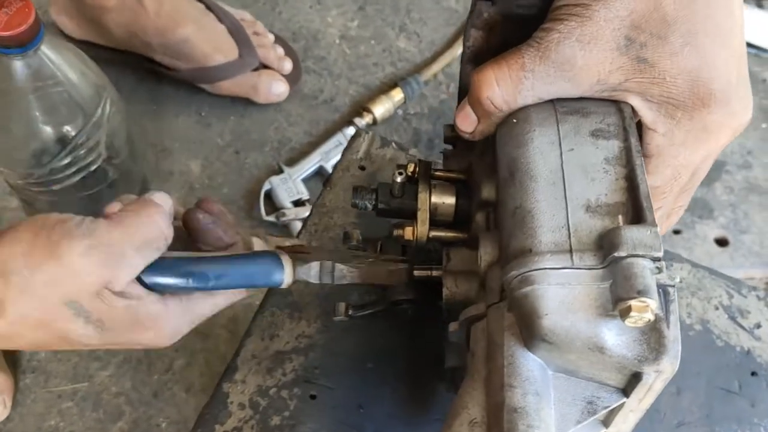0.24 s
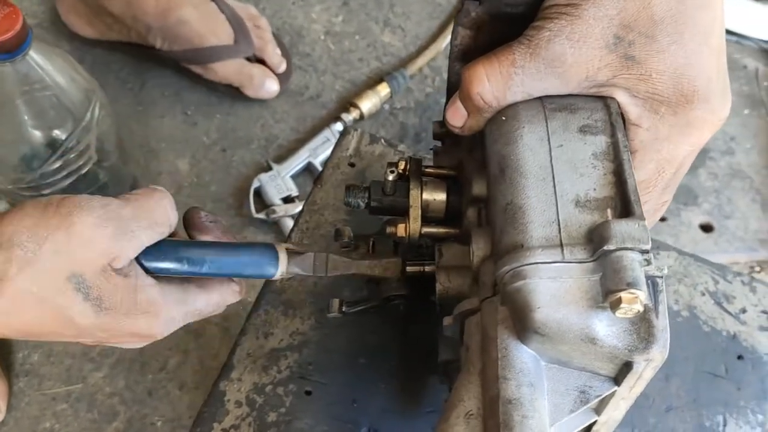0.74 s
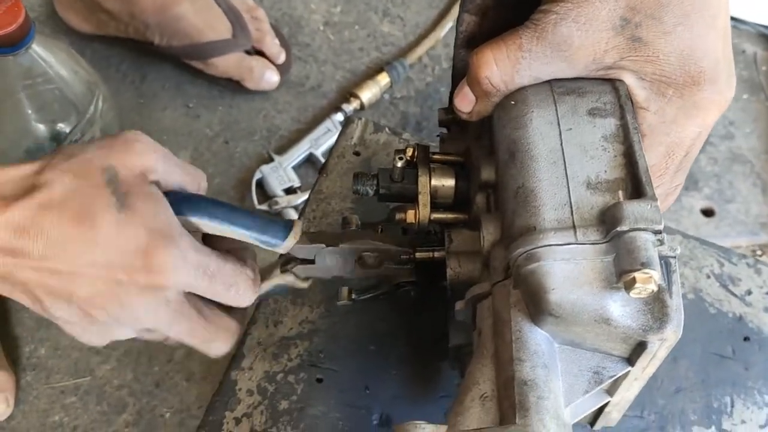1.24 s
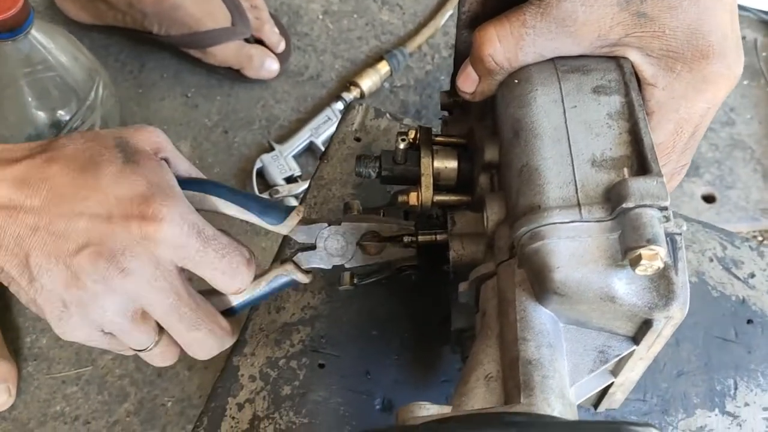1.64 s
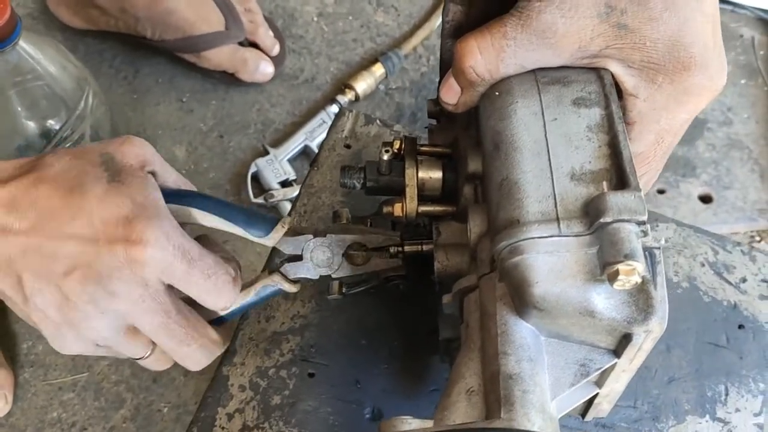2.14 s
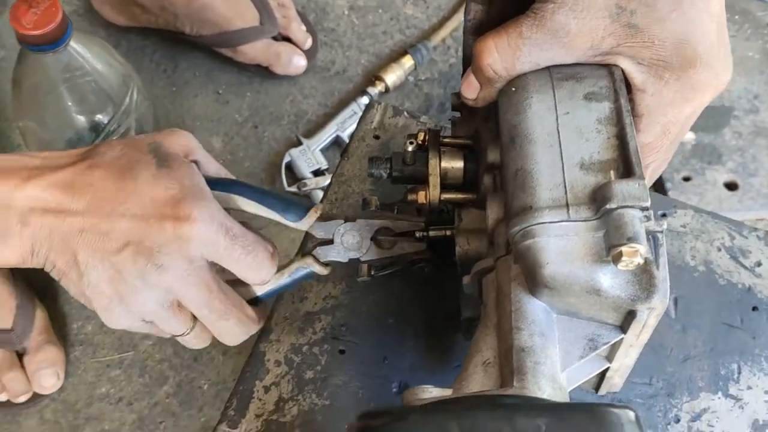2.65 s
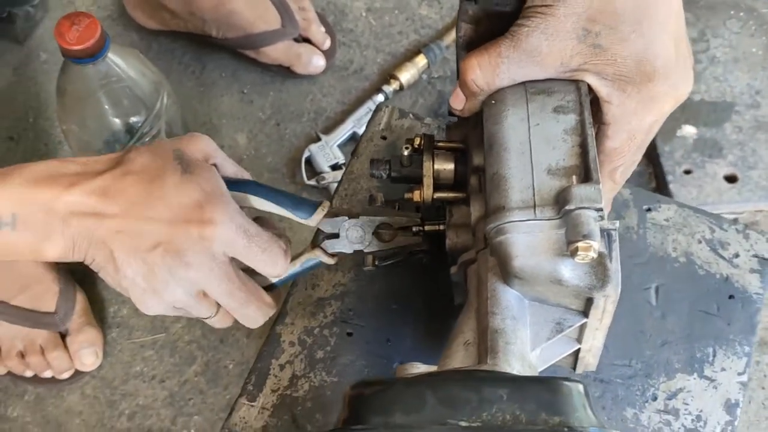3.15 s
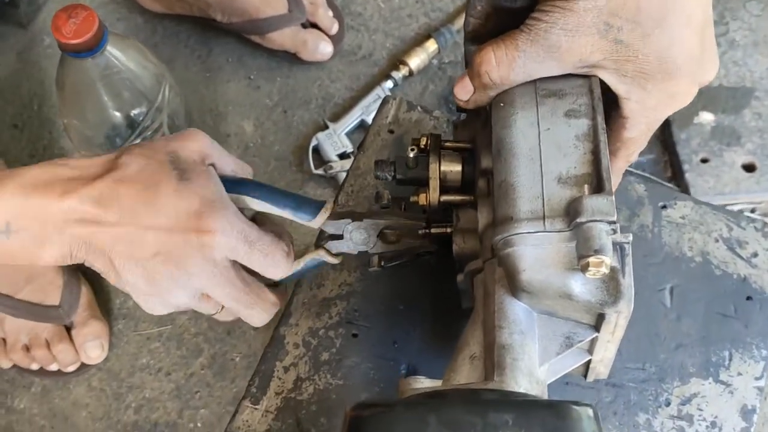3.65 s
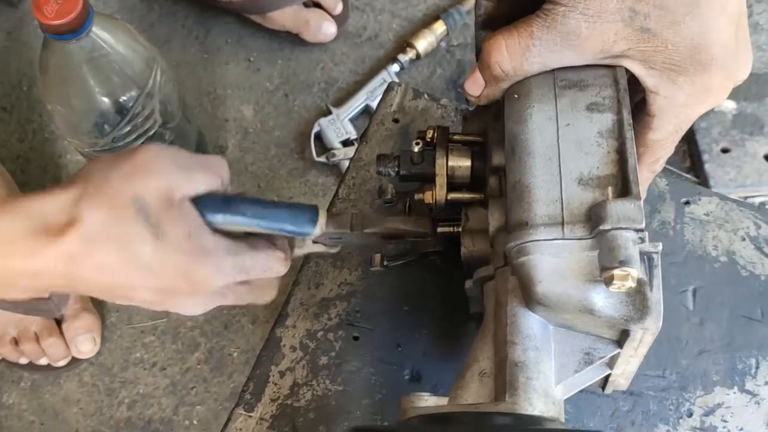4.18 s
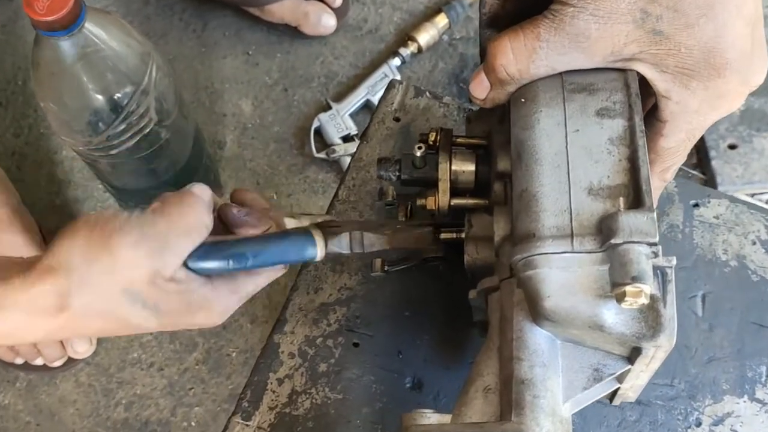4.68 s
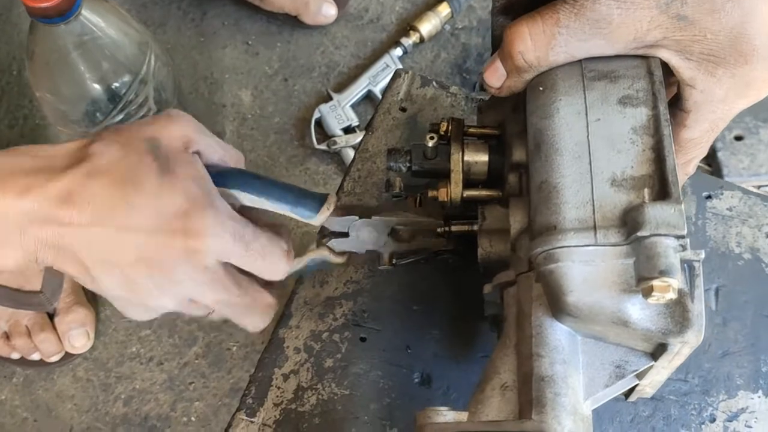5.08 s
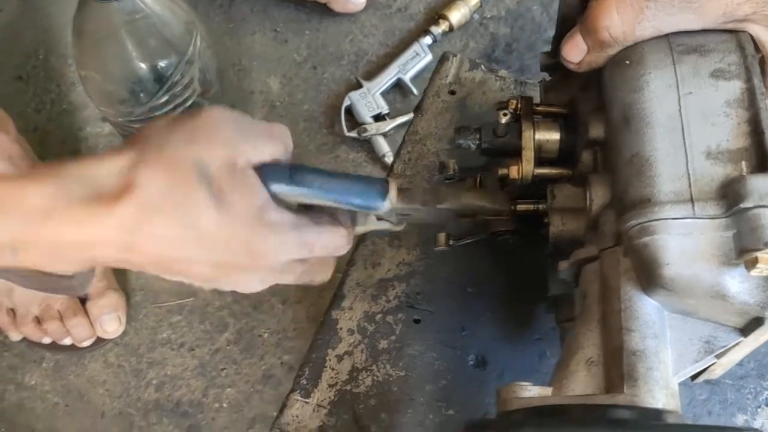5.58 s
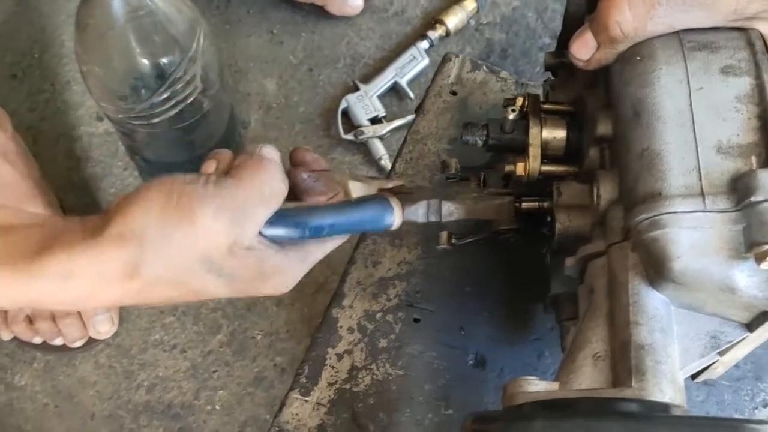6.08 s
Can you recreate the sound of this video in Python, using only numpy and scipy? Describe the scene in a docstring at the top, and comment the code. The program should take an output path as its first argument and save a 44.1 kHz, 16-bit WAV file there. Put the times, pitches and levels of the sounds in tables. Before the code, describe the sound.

Close to the microphone, grit crunches between an engine valve and its seat as pliers turn it to and fro. Each quick, dry rasp swells and dies away, with small metal clicks as the valve lands. The scrapes are uneven at first, then settle into a regular rhythm with faint hissing return turns. Behind them, the workshop has a soft rumble, hiss and a far low hum.

```python
"""Hand-lapping an engine valve.

Pliers twist a valve to and fro on a seat smeared with grinding compound. Crushed grit rasps through
the valve and the aluminium cylinder head while the stem groans by stick and slip. The valve ticks as
it lands and whispers in its guide as it is turned back. Close stereo, workshop hiss, a far low drone."""
import sys
import numpy as np
from scipy import signal
from scipy.fft import rfft, irfft, next_fast_len
from scipy.io import wavfile
from scipy.ndimage import uniform_filter1d

SR = 44100
rng = np.random.default_rng(int(sys.argv[2]) if len(sys.argv) > 2 else 0)


def to_wav(s):
    """Save 16-bit WAV."""
    ch = np.atleast_2d(s).T  # columns
    pcm = np.round(np.clip(ch, -1, 1) * 32767)  # PCM
    wavfile.write(sys.argv[1], SR, pcm.astype(np.int16))


N = 278756
TAPS = 4096
TIME_S = np.arange(N) / SR
BINS_HZ = np.fft.rfftfreq(TAPS, 1 / SR)


def amp(db):
    """Decibels to gain."""
    return 10 ** (np.asarray(db) / 20)


def unit_rms(x):
    """Scales to rms 1."""
    return x / np.sqrt(np.mean(x ** 2) + 1e-20)


def curve(points):
    """A (frequency, value) table interpolated onto BINS_HZ over log frequency."""
    hz, value = np.transpose(points)
    return np.interp(np.log(BINS_HZ + 1), np.log(hz + 1), value)


def add(mix, start_s, sound):
    """Mixes a multichannel sound in at start_s."""
    part = mix[:, max(round(start_s * SR), 0):][:, :sound.shape[1]]
    part += sound[:, :part.shape[1]]


def wander(length, rate_hz):
    """Smooth noise of rms about 1, rolled off above rate_hz."""
    size = next_fast_len(length + SR // 8)
    rolloff = np.exp(-.5 * (np.fft.rfftfreq(size, 1 / SR) / rate_hz) ** 2)
    return unit_rms(irfft(rfft(rng.standard_normal(size)) * rolloff, size))[:length]


def minimum_phase(gain):
    """Causal impulse response with this gain over BINS_HZ."""
    log_gain = np.log(np.maximum(gain, gain.max() * 1e-5))
    mirrored = np.concatenate([log_gain, log_gain[-2:0:-1]])
    return np.fft.ifft(np.exp(np.conj(signal.hilbert(mirrored)))).real


def stereo_filter(gain, balance, coherence):
    """Responses (ear, input, taps) for one shared input and one per ear; mid energy 1."""
    shared = np.clip(curve(coherence), 0, .999)
    left, right = amp(curve(balance) / 2), amp(-curve(balance) / 2)
    mid = np.sqrt(left ** 2 + right ** 2 + 2 * shared) / 2
    gain = unit_rms(gain) / mid
    return np.array([[minimum_phase(gain * ear * np.sqrt(share)) for share in (shared, 1 - shared)]
                     for ear in (left, right)])


def excite(responses, drive):
    """Three drives (shared, left, right) through a stereo filter."""
    per_ear = np.array([drive[[0, 1]], drive[[0, 2]]])
    return signal.fftconvolve(per_ear, responses, axes=2).sum(1)


def resonate(x, hz, width_hz):
    """Unity-gain resonance that follows the curve hz."""
    carrier = np.exp(2j * np.pi * np.cumsum(hz) / SR)
    pole = np.exp(-np.pi * width_hz / SR)
    return 2 * (carrier * signal.lfilter([1 - pole], [1, -pole], x / carrier)).real


def coloured_noise(spectrum):
    """Uncorrelated stereo noise of rms 1."""
    response = minimum_phase(amp(curve(spectrum)))
    return unit_rms(signal.oaconvolve(rng.standard_normal((2, N)), response[None], axes=1)[:, :N])


# workshop air spectrum: (frequency [Hz], relative density [dB])
AIR_SPECTRUM = [(15, -21), (25, -6), (98, -3.5), (194, -6.5), (219, -12), (304, -13.5), (367, -15.5),
                (423, -18), (454, -18), (536, -16.5), (1870, -28.5), (3530, -22), (6080, -33), (7000, -35),
                (9100, -71), (15400, -120)]
# its stereo balance: (frequency [Hz], left minus right [dB])
AIR_BALANCE = [(60, -0.5), (100, -0.5), (180, -1.0), (310, 0.5), (550, -1.0), (950, -2.0), (1650, -3.5),
               (2860, -10.5), (4970, -12.0), (8640, -0.5), (15000, -2.5)]
# its likeness between the ears: (frequency [Hz], coherence [0..1])
AIR_COHERENCE = [(50, .98), (150, .96), (400, .92), (1000, .7), (2000, .2), (4000, 0), (16000, 0)]


def workshop_air(level_db=-41.6):
    """Steady rumble and hiss, alike at both ears in the bass, diffuse in the treble."""
    responses = stereo_filter(amp(curve(AIR_SPECTRUM)), AIR_BALANCE, AIR_COHERENCE)
    air = excite(responses, rng.standard_normal((3, N + TAPS)))
    return amp(level_db) * air[:, TAPS:TAPS + N]


# microphone self-noise: (frequency [Hz], relative density [dB])
MIC_SPECTRUM = [(3000, -3), (6500, -41), (7500, 10.5), (10000, 13), (14000, 3), (16000, -11)]


def mic_hiss(level_db=-61):
    """Faint top hiss of the microphones."""
    return amp(level_db) * coloured_noise(MIC_SPECTRUM)


def hum(hz, level_db, waver_db=3, drift_hz=2.5):
    """A tone that wavers in level and pitch."""
    cycles = np.cumsum(hz + drift_hz * wander(N, 8.75)) / SR
    waver = amp(waver_db * wander(N, 6))
    return amp(level_db) * unit_rms(waver * np.sin(2 * np.pi * cycles))


# drone swells: (centre [s], half length [s], target pitch [Hz], level [dB])
DRONE_SWELLS = [(1.818, .15, 89.3, -41), (3.534, 0.19, 104.8, -42), (4.294, 0.1964, 94.55, -45.5),
                (5.535, 0.37, 104, -35.5)]


def far_drone(rest_hz=101.6, rest_db=-50, fundamental_db=-4, octave_db=-15):
    """A far drone with its octave; each swell pulls it toward its own pitch."""
    centre_s, half_s, swell_hz, swell_db = np.transpose(DRONE_SWELLS)[:, :, None]
    swells = amp(swell_db) * np.exp(-((TIME_S - centre_s) / half_s) ** 2)
    level = amp(rest_db) + swells.sum(0)
    hz = (amp(rest_db) * rest_hz + (swells * swell_hz).sum(0)) / level
    fundamental = hum(hz, fundamental_db, waver_db=2.5, drift_hz=4.28)
    return level * (fundamental + hum(2 * hz, octave_db, drift_hz=7.8))


def room(x, level_db=-18, low_t60_s=0.42, high_t60_s=0.36):
    """Sparse reflections from floor and walls; the treble dies first."""
    echoes = rng.standard_normal((2, SR // 2)) * (rng.random((2, SR // 2)) < 3000 / SR)
    echoes[:, :SR // 200] = 0
    hz, t, spectra = signal.stft(echoes, SR, nperseg=256)
    shared = 1 / (1 + (hz[:, None] / 1000) ** 4)  # long waves reach both ears alike
    spectra = np.sqrt(shared) * spectra[0] + np.sqrt(1 - shared) * spectra
    t60_s = np.interp(hz, [500, 8000], [low_t60_s, high_t60_s])[:, None]
    tail = signal.istft(spectra * 10 ** (-3 * t / t60_s), SR, nperseg=256)[1]
    tail /= np.linalg.norm(tail, axis=1, keepdims=True)
    return amp(level_db) * signal.fftconvolve(x, tail, axes=1)[:, :N]


# return turns of the lifted valve: (start [s], length [s], time to top speed [s], level there [dB])
RETURN_TURNS = [(2.448, 0.36, 0.073, -50), (3.93, .19, 0.099, -47.5), (4.393, .15, .09, -50),
                (4.84, .27, 0.075, -42.5), (5.31, 0.23, 0.088, -42), (5.778, .24, 0.097, -43.5)]
# stem-in-guide friction: (frequency [Hz], relative density [dB])
WHISPER_SPECTRUM = [(2500, -34), (5000, 11), (6500, -10), (7600, -5), (9900, 8.5), (11500, -6), (16000, -2)]


def stem_whisper(trim_db=-3.5, ends_db=-16):
    """The unloaded stem slides in its guide, speeding up and slowing again."""
    speed = np.zeros(N)
    for start_s, length_s, fastest_s, level_db in RETURN_TURNS:
        arch_db = np.interp(TIME_S - start_s, [0, fastest_s, length_s], [ends_db, 0, ends_db])
        turning = (TIME_S > start_s) & (TIME_S < start_s + length_s)
        speed += amp(level_db + arch_db) * turning
    return amp(trim_db) * uniform_filter1d(speed, SR // 50) * coloured_noise(WHISPER_SPECTRUM)


# longest-lived casting modes: (frequency [Hz], width [Hz], gain [dB])
LONG_MODES = [(220, 14, -4), (296, 2, 1)]


def casting_ring(valve):
    """The casting rings on after each contact, alike at both ears."""
    return sum(amp(db) * resonate(valve.mean(0), np.full(N, hz), width_hz)
               for hz, width_hz, db in LONG_MODES)


# broad response of valve and head: (frequency [Hz], relative gain [dB])
HEAD_SPECTRUM = [(60, -38), (200, -11), (400, -2), (800, -4), (1100, -7.5), (1450, -12), (2100, -9),
                 (3900, -9), (4600, -3.5), (5400, -6), (5900, -14.5), (7400, -25), (9500, -25.5),
                 (13000, -31), (16000, -39)]
# their modes: (frequency [Hz], width [Hz], height over the broad response [dB])
HEAD_RESONANCES = [(224, 30, 4), (297, 18, 4.5), (500, 90, 2), (915, 110, 3.5), (1090, 70, 3),
                   (1329, 60, 3), (1895, 55, 5), (2240, 80, 4.5), (2995, 45, 7), (3053, 25, 6),
                   (3800, 110, 3), (4555, 40, 3.5), (6195, 45, 7), (6400, 120, 4), (7010, 55, 5.5)]
# their stereo balance: (frequency [Hz], left minus right [dB])
HEAD_BALANCE = [(60, -0.5), (95, -0.5), (150, -1.0), (240, -1.0), (380, -1.0), (600, -1.5), (950, -3.0),
                (1500, -6.0), (2380, -10.0), (3770, -17.0), (5980, -11.5), (9470, 0.5), (15000, -3.0)]
# their likeness between the ears: (frequency [Hz], coherence [0..1])
HEAD_COHERENCE = [(100, .98), (550, .97), (950, .85), (1400, .25), (3000, .05), (4900, .25), (7000, 0),
                  (16000, .05)]


def cylinder_head(crossovers_hz=(1400, 7000)):
    """Stereo responses of valve and head in three bands: low, mid, high."""
    modes = sum((amp(db) ** 2 - 1) / (1 + (2 * (BINS_HZ - hz) / width_hz) ** 2)
                for hz, width_hz, db in HEAD_RESONANCES)
    gain = amp(curve(HEAD_SPECTRUM)) * np.sqrt(np.maximum(1 + modes, .1))
    low, below_high = (1 / (1 + (BINS_HZ / hz) ** 10) for hz in crossovers_hz)
    return [stereo_filter(gain * np.sqrt(share), HEAD_BALANCE, HEAD_COHERENCE)
            for share in (low, below_high * (1 - low), 1 - below_high)]


def near_reflections(x, strength, count=7, lag_range_s=(.0003, .005)):
    """Fins, pliers and hand comb the sound, by new paths each time."""
    paths = np.zeros((2, round(SR * lag_range_s[1]) + 2))
    for ear in paths:
        lags_s = rng.uniform(*lag_range_s, count)
        gains = unit_rms(rng.choice([-1., 1.], count) / np.sqrt(lags_s)) / np.sqrt(count)
        np.add.at(ear, (SR * lags_s).astype(int), strength * gains)
    paths[:, 0] = 1
    return signal.fftconvolve(x, paths, axes=1)[:, :x.shape[1]] / np.sqrt(1 + strength ** 2)


def grit(length, grains_per_s, spread_db):
    """Three drives of abrasive grains cracking at random times and sizes."""
    hits = rng.random((3, length)) < grains_per_s / SR
    sizes = amp(spread_db * np.minimum(rng.exponential(1, (3, length)), 4))
    return unit_rms(hits * sizes * rng.choice([-1., 1.], (3, length)))


def contact_burst(t, decay_s):
    """A dying cluster of tiny contacts; decay_s sets its energy."""
    fade = np.exp(-t / decay_s)
    contacts = grit(len(t), grains_per_s=14000, spread_db=2.5)
    return unit_rms(contacts * fade) * np.sqrt(np.mean(fade ** 2))


# metal-on-metal contacts: (time [s], level [dB], knock offset [dB], edge offset [dB])
VALVE_TICKS = [(0.0611, -25, -12.5, -15), (0.16, -30, -13, -18), (0.603, -29, -14, -10),
               (0.6666, -26, -17, -14), (0.9722, -24, -5.5, -11), (1.1458, -32, -12, -15),
               (1.3013, -24.5, -14, -13), (1.7853, -33, -12, -3.5), (1.8148, -19, -20, -9),
               (2.0183, -21, -11, -25), (2.3804, -14.5, -18, -30), (2.7583, -25, -13, -10),
               (2.8075, -18.5, -5.5, -17), (3.263, -24.5, -1, -28), (3.4537, -25.5, -16, -19),
               (3.7454, -18, -13, -14), (3.8733, -15.5, -10.5, -28), (4.1941, -15, -7.5, -16),
               (4.3152, -12, -18, -16.5), (4.6571, -23.5, -6, -20), (5.11, -20, -12, -12.5),
               (5.2554, -22, 2, -27), (5.3337, -28.5, -8, -20), (5.58, -30, -3, -3), (5.681, -21, -3, -24),
               (5.809, -29, -4, -16), (6.0488, -28, -7, -18)]


def tick(row, head):
    """The valve lands or the jaws shift: a low knock, a short ring and a bright edge."""
    start_s, level_db, knock_db, edge_db = row
    low, mid, high = head
    t = np.arange(SR // 20) / SR
    knock = excite(low, contact_burst(t, decay_s=.015)) * amp(knock_db - 5)
    ring = excite(mid, contact_burst(t, decay_s=.0017)) * amp(-3)
    edge = excite(high, contact_burst(t, decay_s=.0041)) * amp(edge_db)
    return start_s, amp(level_db) * near_reflections(knock + ring + edge, strength=.5)


def hand_pressure_db(t, length_s, crest_s, bite_db, release_db=-26):
    """Pressure re its value at crest_s: the hand bites, bears down, lets go."""
    to_crest = np.clip(1 - t / crest_s, 0, 1)
    released = np.maximum(t - crest_s, 0) / max(length_s - crest_s, .01)
    return bite_db * to_crest ** 1.66 + release_db * released ** 2.76


def coarse_cracks(length, per_s=260, decay_s=.00029):
    """Force factor: brief surges as coarse grains burst."""
    bursts = (rng.random(length) < per_s / SR) * rng.random(length)
    return 1 + signal.lfilter([1], [1, -np.exp(-1 / (SR * decay_s))], bursts)


def stem_groan(progress, pitch_hz=535, drift_hz=24, waver_db=7, swell_db=7):
    """Stem and pliers stick and slip at an unsteady pitch, most where the turn is fastest."""
    cycles = np.cumsum(pitch_hz + drift_hz * wander(len(progress), 18.8)) / SR
    waver = amp(waver_db * wander(len(progress), 45))
    tone = unit_rms(waver * np.sin(2 * np.pi * (cycles + rng.random())))
    speed = np.exp(-((progress - .36) / .75) ** 2)
    return tone * amp(swell_db * speed) * amp([[-1], [0]])  # slightly to the right


def squeaks(ring_hz, per_s=40, scatter_hz=520, decay_s=.0042):
    """A grain sticks and makes the valve sing for a few milliseconds."""
    length = len(ring_hz)
    drive = np.zeros((3, length))
    t = np.arange(SR // 30) / SR
    count = max(round(per_s * length / SR), 1)
    for position, detune, size in rng.random((count, 3)):
        start = int(position * length)
        hz = ring_hz[start] + scatter_hz * (2 * detune - 1)
        envelope = (.089 + size) * t * np.exp(-t / decay_s)
        add(drive, start / SR, envelope * np.sin(2 * np.pi * (hz * t + rng.random((3, 1)))))
    return unit_rms(drive)


def valve_ring(crunch, base_hz, press_db, hz_per_db=3, wander_hz=138):
    """The valve's ring rises with pressure and wanders as the contact point moves."""
    hz = base_hz + hz_per_db * press_db + wander_hz * wander(len(press_db), 13.4)
    return amp(-8.5) * resonate(crunch, hz, width_hz=550) + amp(-18) * squeaks(hz)


# wrist twists: (start [s], length [s], grip time [s], time to crest [s], crest level [dB],
# bite re crest [dB], growl offset [dB], fizz offset [dB], groan offset [dB], base ring pitch [Hz])
WRIST_TWISTS = [(0.017, 0.15, 0.013, 0.061, -49.5, 9, -8.5, -5, -11, 4600),
                (0.15, 0.22, 0.018, 0.17, -25, -14.5, -4.5, -8.5, -6.5, 5030),
                (0.378, 0.19, 0.06, 0.1, -27.0, -19.5, -2.5, -9.2, -12, 4900.0),
                (0.6, 0.062, 0.004, 0.013, -41.5, 0.0, -10, -10, -9, 5050.0),
                (0.64, 0.13, 0.045, 0.032, -31, -22, -5.5, -8.5, -16, 4980),
                (0.717, 0.13, 0.014, 0.093, -32, -19.5, -1, -9.0, -1, 4940),
                (1.295, 0.193, 0.0038, 0.12, -24.5, -11.5, -2.5, -10, -9.2, 5170),
                (1.481, 0.26, 0.025, 0.14, -26.0, -18.5, -3, -11, -5.5, 4900),
                (1.79, 0.19, 0.03, 0.087, -24.0, -6.0, -3.5, -10.5, -9, 5240),
                (1.979, 0.2, 0.036, 0.061, -27, -18, -0.5, -9.5, -8.5, 4840),
                (2.225, 0.22, 0.012, 0.09, -24.5, -19.5, -4, -11.5, -5, 5040),
                (2.431, 0.066, 0.056, 0.038, -42, -4, 5.5, -10, 6.5, 4790.0),
                (2.757, 0.047, 0.004, 0.035, -43, 8.5, -16, -6, -13, 5000),
                (2.768, 0.22, 0.041, 0.11, -24.0, -15.5, -4, -9.5, -8, 4930.0),
                (2.962, 0.13, 0.04, 0.058, -35.5, -10, 0.3, -8.5, -0.5, 4860),
                (3.042, 0.16, 0.053, 0.054, -33.5, -22, -3, -11.0, 2.8, 4660),
                (3.243, 0.177, 0.012, 0.051, -25, -14, -2.5, -11, -4.5, 4920),
                (3.452, 0.066, 0.0039, 0.013, -41, 0.0, 1.7, -12, -4, 4570),
                (3.742, 0.18, 0.0017, 0.1, -26, -3, -4.5, -9, -6.5, 4850),
                (4.189, 0.194, 0.0054, 0.091, -24.5, -8, -4.5, -10, -7.5, 4600),
                (4.656, 0.18, 0.0023, 0.084, -23, -8.0, -4.5, -8.5, -9.0, 4940),
                (5.105, 0.19, 0.003, 0.14, -21.5, -20.5, -4.5, -10, -8.8, 4570),
                (5.579, 0.21, 0.003, 0.13, -23, -13, -4.5, -11.2, -9, 4670.0),
                (6.025, 0.2, 0.021, 0.082, -23.5, -19, -2.5, -9, -8, 4680),
                (6.236, 0.17, 0.04, 0.067, -29.5, -9.5, -1, -7.6, -4.5, 4550)]


def twist(row, head, chatter_db=.85, chatter_hz=110):
    """One turn on the seat: crushed grit catches and slips, driving growl, rasp and fizz."""
    start_s, length_s, grip_s, crest_s, level_db, bite_db, growl_db, fizz_db, groan_db, ring_hz = row
    low, mid, high = head
    t = np.arange(0, length_s * 1.2, 1 / SR)
    press_db = hand_pressure_db(t, length_s, crest_s, bite_db)
    pressure = amp(level_db + press_db) * np.minimum(t / grip_s, 1)
    chatter = amp(chatter_db * wander(len(t), chatter_hz))
    force = pressure * unit_rms(chatter * coarse_cracks(len(t)))
    # more pressure tilts the balance from fizz to growl
    growl_force = force * amp(growl_db + .5 + .21 * press_db)
    fizz_force = force * amp(fizz_db - 1.1 - .2 * press_db)
    growl = excite(low, grit(len(t), grains_per_s=4000, spread_db=-.55) * growl_force)
    groan = stem_groan(t / length_s) * pressure * amp(groan_db - 5)
    crunch = grit(len(t), grains_per_s=4200, spread_db=1.4)
    rasp = excite(mid, (crunch + valve_ring(crunch, ring_hz, press_db)) * force * amp(-3.4))
    fizz = excite(high, grit(len(t), grains_per_s=4000, spread_db=1.6) * fizz_force)
    sound = growl + near_reflections(rasp, strength=.45) + near_reflections(fizz, strength=.9)
    add(sound, 0, groan)
    return start_s, sound


def scene():
    """Twists, ticks and return turns in front of the workshop background."""
    head = cylinder_head()
    valve = np.zeros((2, N))
    for row in WRIST_TWISTS:
        add(valve, *twist(row, head))
    for row in VALVE_TICKS:
        add(valve, *tick(row, head))
    lapping = valve + casting_ring(valve) + room(valve) + stem_whisper()
    background = workshop_air() + mic_hiss() + far_drone() + hum(hz=52.4, level_db=-52.5)
    return lapping + background


def record(dry, bass_cut_hz=36, band_limit_hz=15800):
    """Bass cut and steep band limit."""
    highpass = signal.butter(4, bass_cut_hz, "high", fs=SR, output="sos")
    lowpass = signal.firwin(511, band_limit_hz, window=("kaiser", 9), fs=SR)
    return signal.oaconvolve(signal.sosfilt(highpass, dry), lowpass[None], "same")


dry = scene()
out = record(dry)
to_wav(out)
```